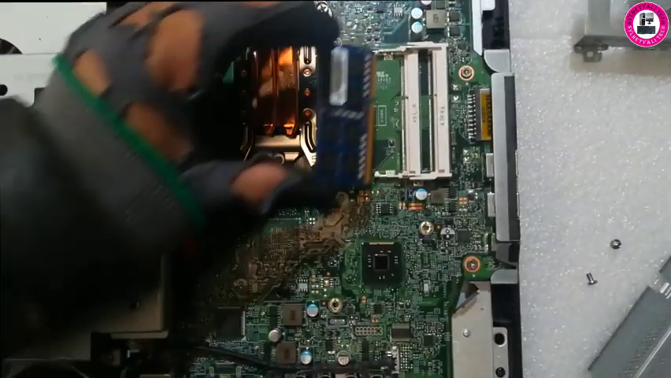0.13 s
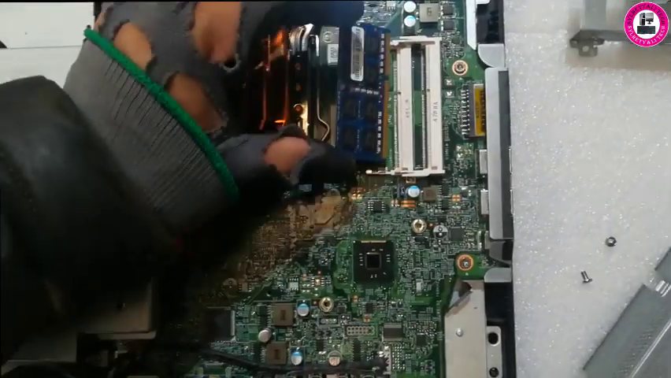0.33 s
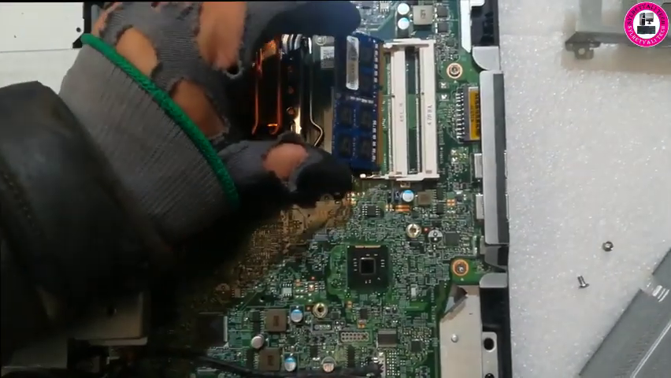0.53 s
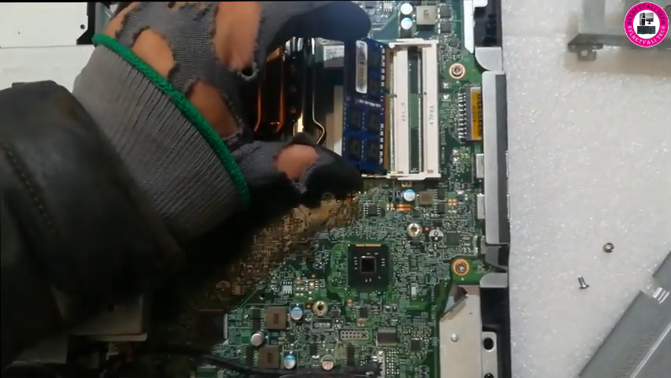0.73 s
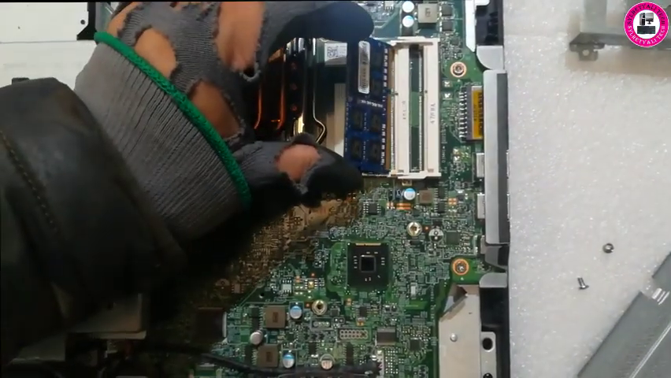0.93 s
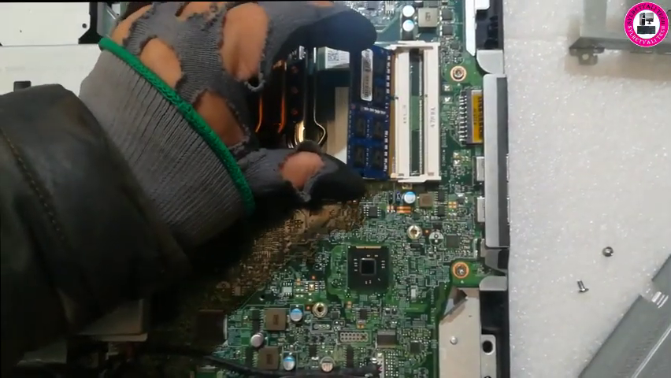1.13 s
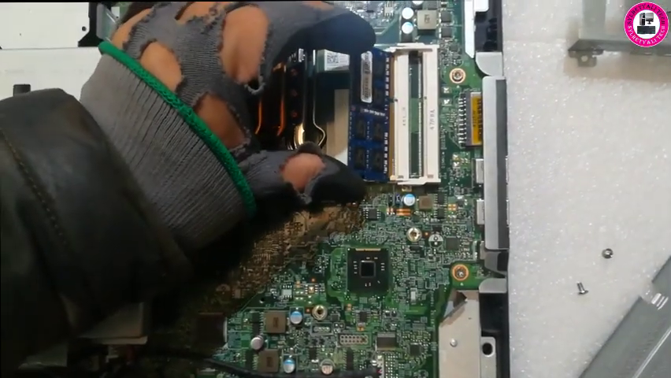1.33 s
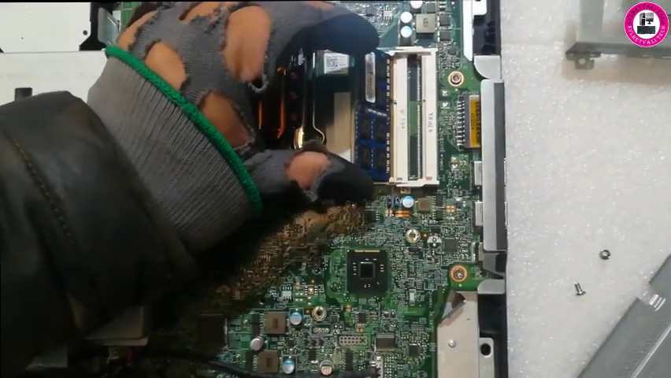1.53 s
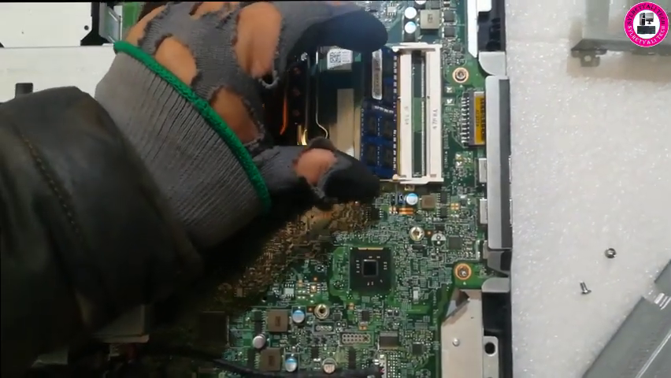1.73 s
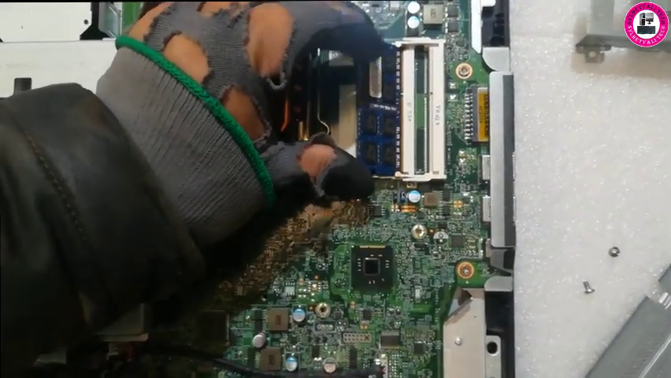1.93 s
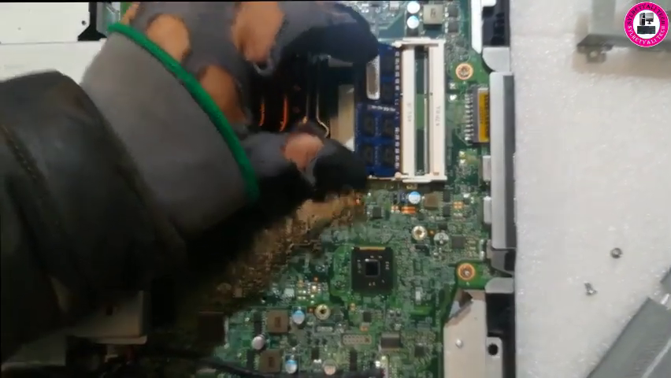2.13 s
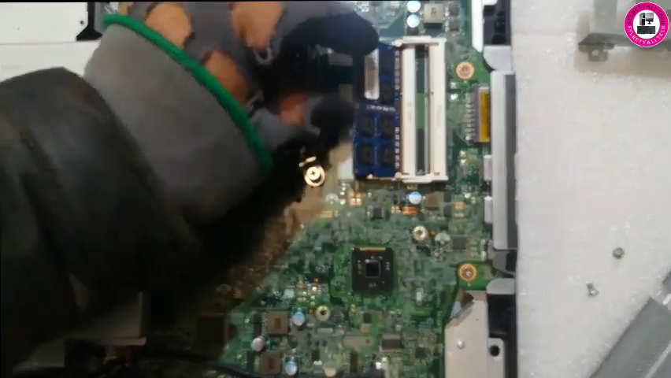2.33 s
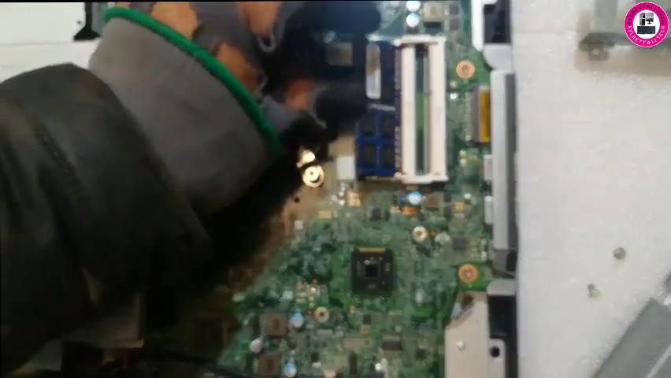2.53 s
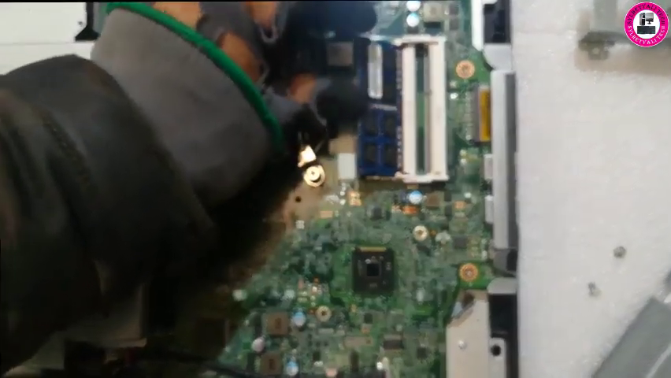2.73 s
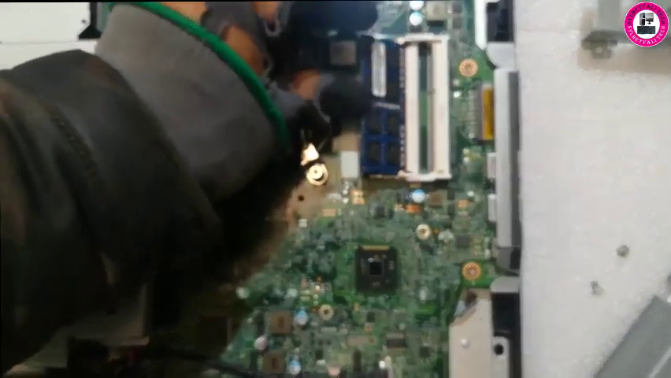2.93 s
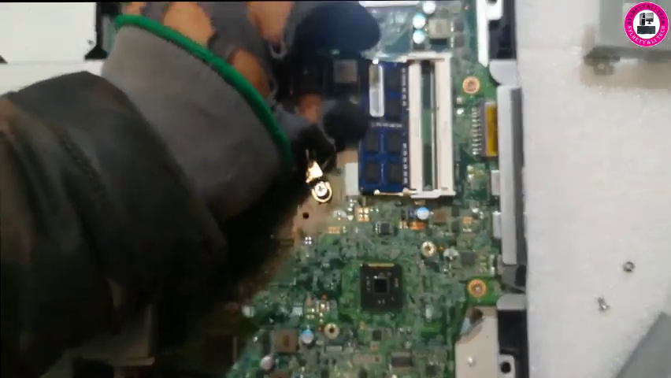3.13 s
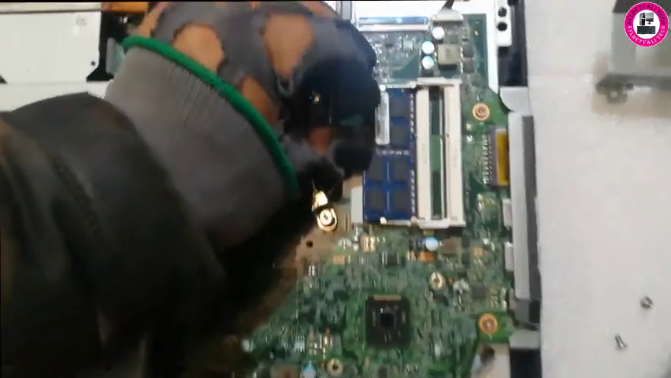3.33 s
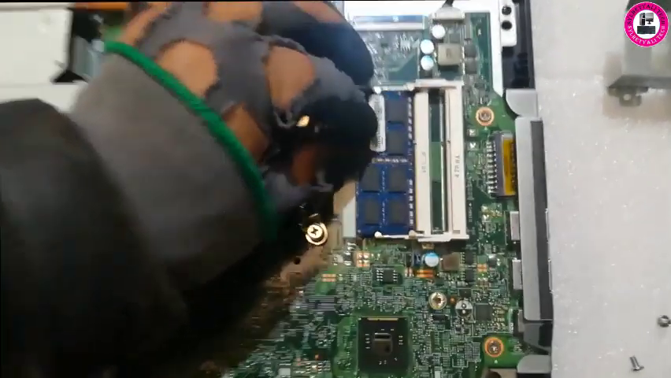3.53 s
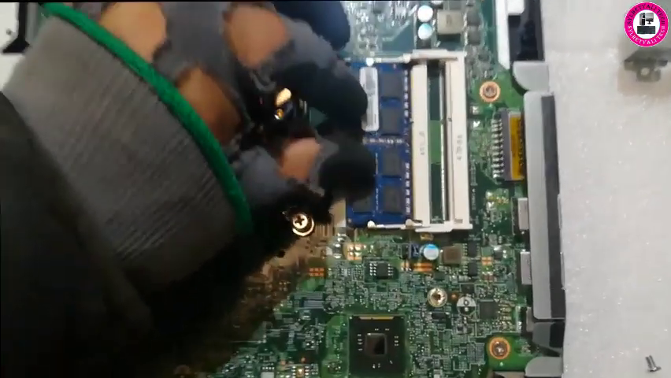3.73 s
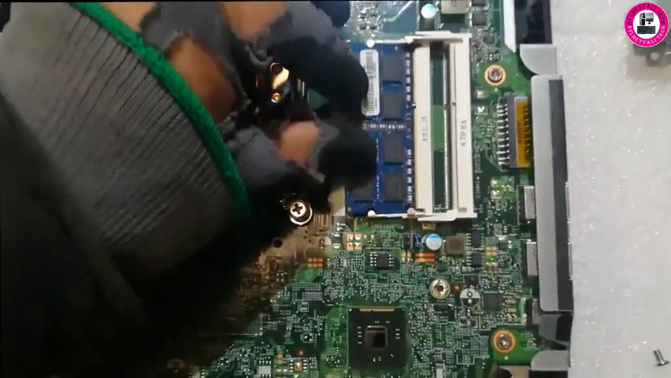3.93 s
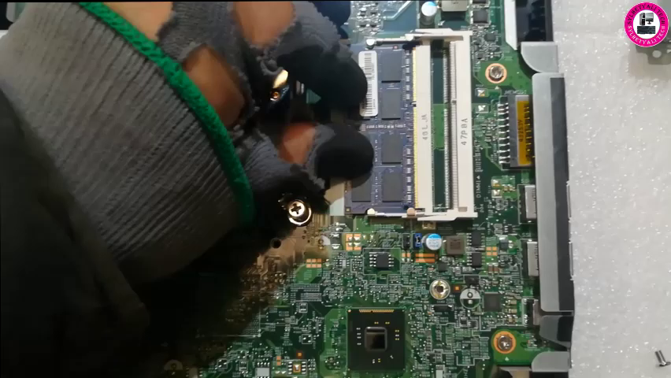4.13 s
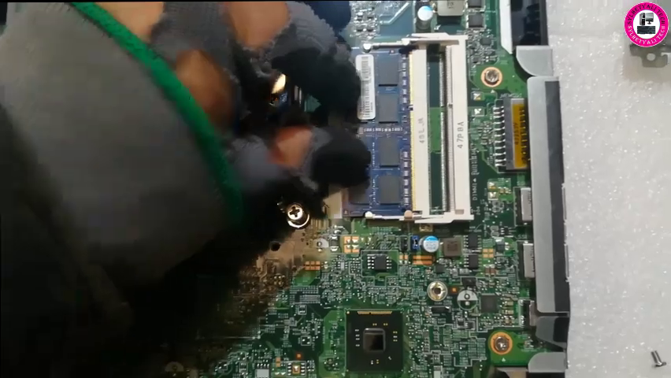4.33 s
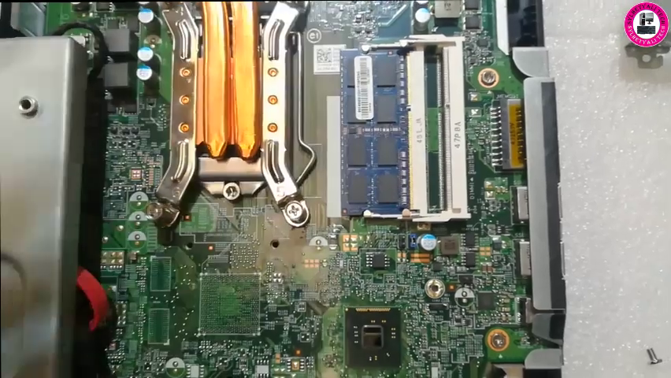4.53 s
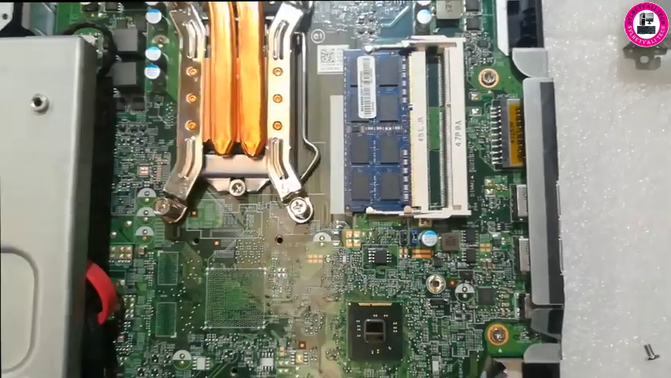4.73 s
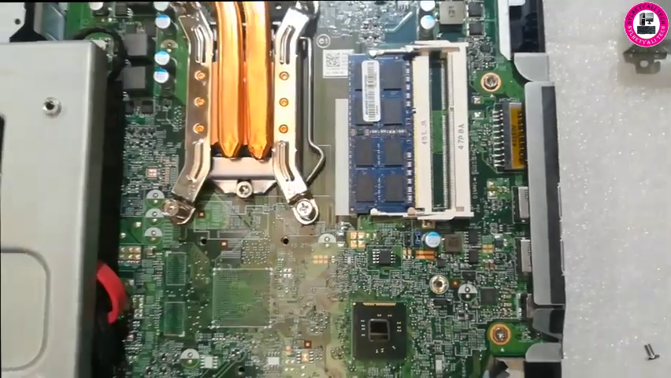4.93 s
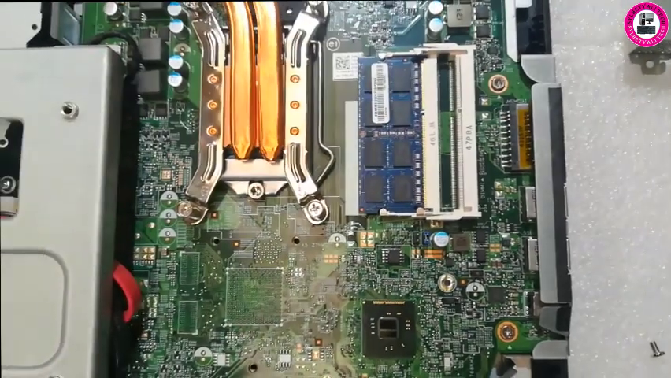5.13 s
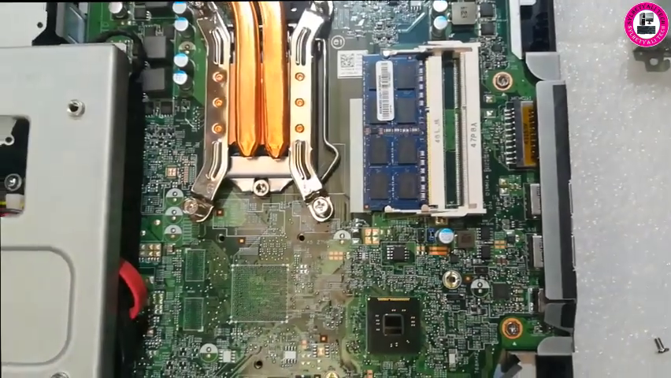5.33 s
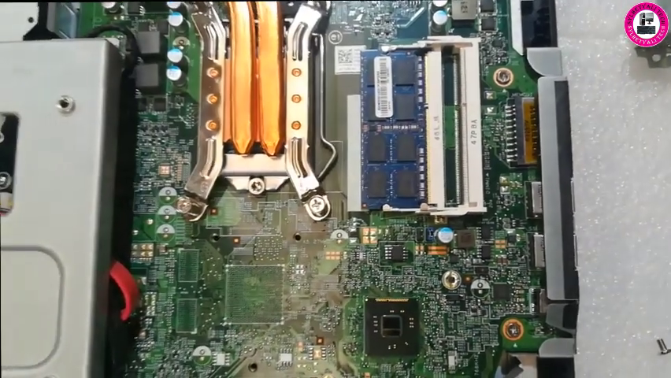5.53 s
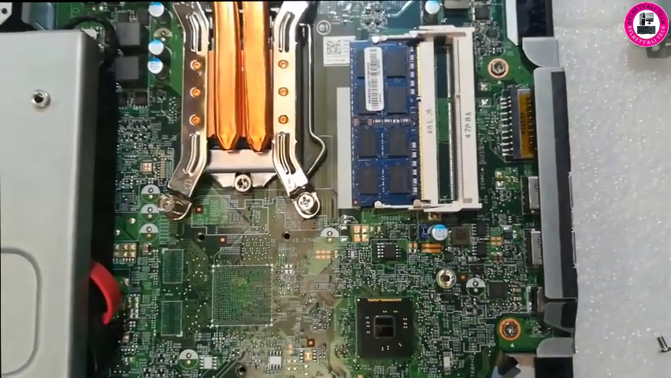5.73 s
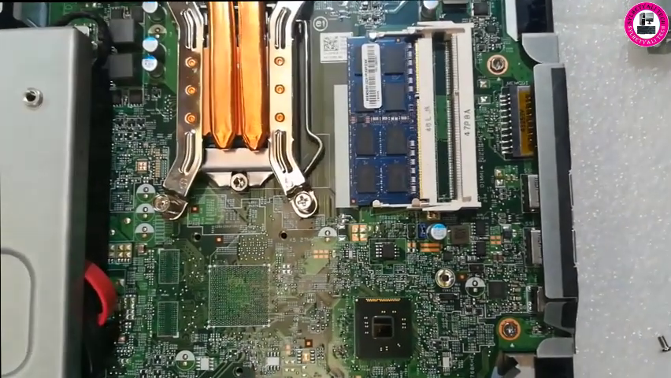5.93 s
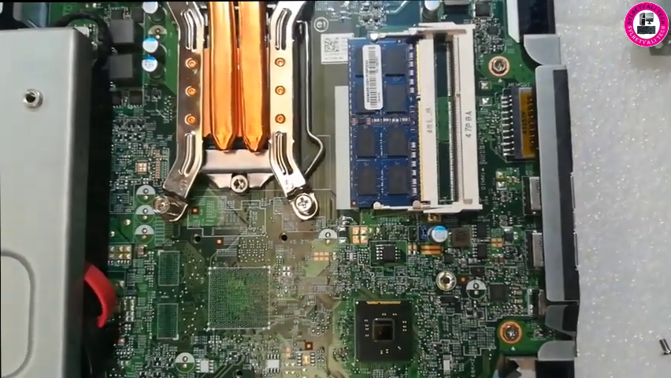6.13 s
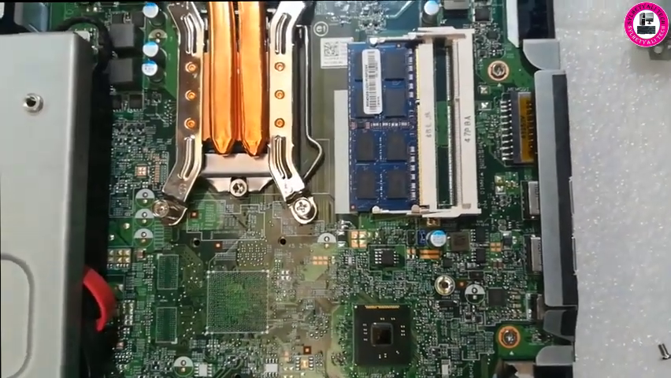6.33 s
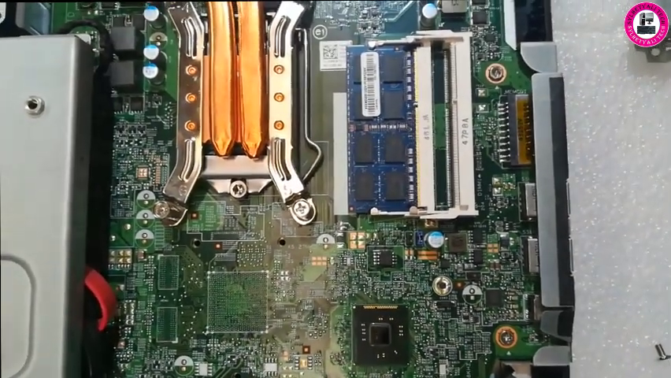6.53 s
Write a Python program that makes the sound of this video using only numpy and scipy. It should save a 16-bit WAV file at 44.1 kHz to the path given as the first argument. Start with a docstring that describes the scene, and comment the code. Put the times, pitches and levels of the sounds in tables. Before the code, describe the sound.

Small hard clicks of a module seating in a slot, ending in one loud double snap, over a low throbbing motor drone and airflow.

```python
"""A gloved hand slides a memory module into a laptop's slot, seats it and presses it until the latches snap.
Each contact is a noise crack plus ringing modes of board and latch springs, close up in a small room.
Cloth swells and scuffs as shaped noise; decaying sines boom in the case; fine high ticks are treble bursts.
Behind it an electric motor drones as a stack of sines, throbbing against the mains hum, in a rush of air."""
import sys
import numpy as np
from scipy import signal
from scipy.fft import rfft, irfft
from scipy.io import wavfile
from scipy.ndimage import uniform_filter1d

SR = 44100
rng = np.random.default_rng(int(sys.argv[2]) if len(sys.argv) > 2 else 0)


def bounce(signal):
    """Save signal as a 16-bit WAV file at the path given by the first command-line argument."""
    frames = np.transpose(np.atleast_2d(signal))
    limited = np.clip(frames, -1, 1)
    pcm = np.round(limited * 32767).astype(np.int16)
    wavfile.write(sys.argv[1], SR, pcm)


N = 291060
TIME = np.arange(N) / SR  # seconds

# Tone of sliding cloth and soft swells. Each row: frequency in Hz, relative level in dB.
CLOTH_COLOUR = [(400, -25), (1000, -6), (2100, -8), (4400, -2.5), (6500, -10.5), (8000, -7), (10000, -20),
                (16000, -17)]
# Tone of the fine high hiss in the air and the swells. Each row: frequency in Hz, relative level in dB.
HISS_COLOUR = [(7000, -20), (9000, -1), (10500, 3.5), (12500, -0.5), (16000, 0)]


def undb(db):
    """Decibels to gain."""
    return 10 ** (np.asarray(db) / 20)


def unit(x):
    """Scale to rms 1."""
    return x / np.sqrt(np.mean(x ** 2))


def on_bins(points, size):
    """Read (Hz, value) points at the bins of a spectrum, along a log frequency axis."""
    hz, value = np.transpose(points)
    bins_hz = np.fft.rfftfreq(size, 1 / SR)
    return np.interp(np.log(bins_hz + 1), np.log(hz + 1), value)


def noise(colour, size=N, alike=0.):
    """Coloured stereo noise of rms 1, with a given likeness (-1 to 1) between the ears."""
    mid, side = rfft(rng.standard_normal((2, size)))
    alike = np.clip(alike, -1, 1)
    ears = mid * np.sqrt(1 + alike) + side * np.sqrt(1 - alike) * np.array([[1], [-1]])
    return unit(irfft(ears * undb(on_bins(colour, size)), size))


def pan(db):
    """Gains of the two ears for a left-minus-right level in dB."""
    return undb(np.array([[db], [-db]]) / 2)


def band(x, hz, kind, order=4):
    """Causal Butterworth filter."""
    return signal.sosfilt(signal.butter(order, hz, kind, fs=SR, output="sos"), x)


def fade(t, t60):
    """Exponential decay by 60 dB in t60 seconds."""
    return np.exp(-np.log(1000) * t / t60)


def add(out, s, sound):
    """Mix a sound in at a time in seconds."""
    start = int(s * SR)
    out[:, start:start + sound.shape[1]] += sound[:, :N - start]


def walk(rate):
    """Slow random drift with a spread near 1, through `rate` random points a second."""
    knots = rng.standard_normal(400)
    return np.interp(TIME * rate, np.arange(len(knots)), knots)


def hush(rise_s, hush_db=-11, rise_at_s=0.53):
    """Gain of a background that starts hushed, then settles at 1."""
    since_rise = np.maximum(TIME - rise_at_s, 0)
    return undb(hush_db * np.exp(-since_rise / rise_s))


def motor(away, waver_db=1.1, housing_waver_db=2, ear_lag_s=0.00041, side_over_db=2, side_away_db=-4):
    """Shaft lines beat four times a second against the mains lines just above them; the housing sings."""
    # Multiples of the shaft rate from twice upwards.
    # Each row: level with the arm over the board in dB, level with the arm away in dB, before the drone gain.
    shaft_lines = [(-47, -48), (-72, -72), (-57, -58.5), (-66, -66), (-56, -57), (-65, -69), (-61, -67),
                   (-68, -83), (-58, -67), (-65, -66), (-65, -68), (-73, -72), (-68, -66), (-70, -64),
                   (-75, -73), (-73, -67)]
    # Magnetic hum: twice the mains, its sideband and its octave.
    # Each row: level with the arm over in dB, level with the arm away in dB, before the drone gain.
    mains_lines = [(-57.3, -58.5), (-62, -66), (-63.5, -66)]
    # The housing sings on high multiples of the shaft rate.
    # Each row: multiple, level with the arm over in dB, level with the arm away in dB, before the drone gain.
    housing_lines = [(33, -64, -62), (34, -69, -72), (35, -62, -61), (36, -63, -65), (37, -65, -72),
                     (38, -64, -63), (39, -63, -63), (40, -63, -61), (42, -66, -66), (48, -75, -69),
                     (58, -74, -71), (80, -70, -71)]
    shaft_hz, mains_hz = 23.99, 50.04
    throb_s = 1.018  # a moment when neighbouring lines line up

    shaft_line_hz = shaft_hz * np.arange(2, len(shaft_lines) + 2)
    low_hz = [*shaft_line_hz, 2 * mains_hz, 2 * mains_hz + 4 * shaft_hz, 4 * mains_hz]
    phases = rng.uniform(0, 2 * np.pi, 100)

    def line(hz, levels_db, wander_db, t):
        """Neighbouring lines share a phase, so they swell together at each throb."""
        db = levels_db[0] * (1 - away) + levels_db[1] * away + wander_db * walk(9.5)
        phase = phases[round(hz / shaft_hz)]
        return np.sqrt(2) * undb(db) * np.sin(2 * np.pi * hz * t + phase)

    low_lines = zip(low_hz, shaft_lines + mains_lines)
    hum = sum(line(hz, db, waver_db, TIME - throb_s) for hz, db in low_lines)
    # the housing's short waves reach the right ear first; their balance shifts as the arm leaves
    ear_time = TIME - np.array([[ear_lag_s], [0]])
    whine = sum(line(k * shaft_hz, db, housing_waver_db, ear_time) for k, *db in housing_lines)
    return hum + whine * (pan(side_over_db) * (1 - away) + pan(side_away_db) * away)


def comb(x, lag_s=0.001149, sway_s=.00008, share=0.2):
    """A nearby reflection combs the rush with slowly drifting bands."""
    late = TIME - lag_s - sway_s * walk(2.8)
    reflection = np.array([np.interp(late, TIME, ear) for ear in x])
    return (x + share * reflection) / np.hypot(1, share)


def background(flicker_db=1.5, drift_db=0.02):
    """Motor drone and moving air; the tone of both changes as the arm leaves."""
    # The arm leaves. Each row: time in seconds, share of the way out.
    arm_path = [(4.25, 0.012), (4.75, 1)]
    # Low air and room noise, arm over the board. Each row: frequency in Hz, relative level in dB.
    rumble_over = [(20, 4), (60, -6), (110, -2), (175, -1), (230, -2), (290, -4.5), (400, -8), (480, -13.5),
                   (650, -11.5), (850, -11), (980, -18), (1100, -9), (1300, -31), (1700, -43)]
    # Low air and room noise, arm away. Each row: frequency in Hz, relative level in dB.
    rumble_away = [(20, 3), (60, -7), (110, -6.5), (165, -2.5), (230, -10.5), (370, -2), (480, -12.5),
                   (560, -10), (650, -13.5), (830, -8.5), (960, -5), (1050, -20), (1150, -6.5), (1600, -49)]
    # Rush of air, arm over the board. Each row: frequency in Hz, relative level in dB.
    rush_over = [(710, -20), (1200, -0.5), (1310, -5), (1410, -1), (1630, -4), (1890, 0.5), (2150, -4.5),
                 (2500, -7.5), (3270, -3), (3910, -6.5), (4990, -2), (6160, -6), (7110, -12.5), (8130, -11),
                 (9000, -19), (11700, -44), (19800, -120)]
    # Rush of air, arm away. Each row: frequency in Hz, relative level in dB.
    rush_away = [(710, -15), (1200, 5.5), (1310, -58), (1340, 5.5), (1420, -1), (1830, -1.5), (2010, 1),
                 (2500, -5.5), (2840, -1), (3910, -4.5), (4950, 1), (6060, -3), (7170, -11), (8340, -9),
                 (9000, -17), (11700, -45), (19800, -120)]

    away = np.interp(TIME, *np.transpose(arm_path))
    near, far = np.sqrt(np.clip([1 - away, away], 0, 1))  # equal-power crossfade

    # likeness between the ears, by frequency in Hz
    alike = on_bins([(60, 0.78), (150, 0.69), (300, -0.99), (650, -0.45), (1400, 0.41)], N)
    rumble = near * undb(-53.5) * noise(rumble_over, alike=alike)
    rumble = rumble + far * undb(-53) * noise(rumble_away, alike=alike)

    rush = near * undb(-54.5) * noise(rush_over) + far * undb(-52.5) * noise(rush_away)
    rush = rush * undb(flicker_db * walk(22) + drift_db * walk(3.86))
    hiss = undb(-65) * noise(HISS_COLOUR)

    # the motor swells by 2 dB just after the snap
    motor_db = 0.13 + 2.0 * np.exp(-((TIME - 3.94) / 0.38) ** 2)
    drone = undb(motor_db) * motor(away) + rumble * pan(-3)
    air = comb(rush) * pan(-4) + hiss * pan(3.4)
    # the air rises a little behind the drone
    return drone * hush(rise_s=0.075) + air * hush(rise_s=0.12)


def contact(pitch_hz, levels_db, ring_db, crack_db=11, crack_t60=0.02, knock_width=1.35, latch_hz=1850,
            tick_hz=7000, scatter_hz=1800, span_s=0.0026):
    """A short crack excites ringing modes, shared between board knock, latch ring and bright tick."""
    # Modes of board, slot and latch springs.
    # Each row: frequency in Hz, relative level in dB, decay by 60 dB in seconds.
    modes = [(743, -5.5, 0.089), (884, 5.5, 0.027), (1017, 0, 0.039), (1378, 0, 0.045), (1572, 0, 0.039),
             (2096, -1.5, 0.036), (2000, -6, 0.057), (2430, 2, 0.019), (3120, -7, 0.025),
             (3320, -3.5, 0.04), (3870, -1, 0.021), (4550, 6.5, 0.015), (5360, 2.5, 0.02),
             (5910, 2.5, 0.014), (6860, -13, 0.028), (8230, 5, 0.0068), (9900, -31, .016),
             (10100, -20, 0.029), (13400, -53, 0.007), (16000, -23, 0.011)]
    # Tone of the crack. Each row: frequency in Hz, relative level in dB.
    crack_colour = [(100, -16), (480, -21), (700, 21), (900, 8), (1500, -4), (1750, 5), (3300, 4.5),
                    (5500, -0.5), (7200, -5), (10000, -7), (16000, -8.5)]

    t = np.arange(4096) / SR
    hz, db, t60 = np.transpose(modes)[:, :, None, None]
    # long waves reach both ears in step, short ones scatter off the hand and the parts
    phases = hz / scatter_hz * rng.standard_normal((len(modes), 2, 1))
    ring = np.sum(undb(db) * fade(t, t60) * np.sin(2 * np.pi * hz * t + phases), axis=0)
    crack = noise(crack_colour, size=len(t), alike=0.1) * fade(t, crack_t60)
    blow = undb(ring_db) * ring + undb(crack_db) * crack

    # the place of the contact picks the board's modes; so small a board radiates little bass
    board = band(blow, 780, "high", order=5)
    knock = band(board, [pitch_hz / knock_width, pitch_hz * knock_width], "band", order=2)
    latch = band(blow, [latch_hz, tick_hz], "band")
    tick = band(blow, tick_hz, "high")
    mix = sum(undb(level_db) * unit(part) for level_db, part in zip(levels_db, (knock, latch, tick)))
    # a level is that of the part's energy gathered into the first few milliseconds
    return mix * np.sqrt(span_s / t[-1])


def module(ring_db=0):
    """The module knocks against slot and latches, and chatters down the springs between the last snaps."""
    # Contacts of module, slot and latches.
    # Each row: start in seconds, knock pitch in Hz, board knock in dB, latch ring in dB, bright tick in dB.
    contacts = [(0.075, 1190, -59, -55, -66), (0.567, 1080, -51.5, -56, -67.5),
                (0.772, 1100, -48.5, -46.5, -70), (0.9265, 1070, -42.5, -49, -62),
                (1.251, 1300, -36.5, -42, -54), (1.381, 990, -41.5, -48, -69),
                (1.410, 990, -42.5, -48, -65), (1.589, 1090, -48, -39, -48), (1.5941, 900, -25, -32, -57),
                (2.431, 1380, -28, -43, -54), (2.4407, 1200, -40, -38, -51), (2.454, 880, -22, -40, -42),
                (2.4575, 1600, -27, -29.5, -57), (2.6525, 1480, -43.5, -33.5, -47),
                (3.8, 1490, -32.5, -44, -44), (3.821, 1230, -23, -32, -50), (3.8236, 1430, -13, -11.5, -14),
                (3.8357, 1200, -15.5, -10, -9.5), (3.838, 1080, -16.5, -7.5, -12)]
    # Uneven radiation to the two sides. Each row: frequency in Hz, left minus right in dB.
    side_balance = [(400, 0), (700, 9), (1000, 4.5), (1400, 3), (2380, 0.5), (4400, -4.5), (8120, -0.5),
                    (15000, 5)]

    out = np.zeros((2, N))
    for s, pitch_hz, *levels_db in contacts:
        add(out, s, contact(pitch_hz, levels_db, ring_db))

    # three slips about 3 ms apart, each weaker than the last
    chatter_db = np.array((-15, -11.5, -24))  # knock, ring and tick at the start of the chatter
    fade_db_per_s, jitter_s = 300, 0.0003
    for late in 0.003 * np.arange(3) + jitter_s * rng.standard_normal(3):
        add(out, 3.826 + late, contact(1150, chatter_db - fade_db_per_s * late, ring_db))

    sides = undb(on_bins(side_balance, N) * np.array([[1], [-1]]) / 2)
    even_power = np.sqrt(np.mean(sides ** 2, axis=0))
    return irfft(rfft(out) * sides / even_power, N)


def room(x, split_hz=4500, low_t60=0.59, treble_t60=0.37, build_s=0.0015):
    """A small room's diffuse tail, shorter in the treble; each channel radiates along its own paths."""
    t, out = TIME[:SR // 2], 0
    for ray in x:
        wash = rng.standard_normal((2, len(t)))
        low = band(wash, split_hz, "low") * fade(t, low_t60)
        treble = undb(-2) * band(wash, split_hz, "high") * fade(t, treble_t60)
        tail = (low + treble) * (1 - np.exp(-t / build_s))
        tail = unit(tail) / np.sqrt(len(t) * len(x))  # keeps the energy of the source
        out = out + signal.oaconvolve(ray[None], tail, axes=1)[:, :N]
    return out * pan(-4.5)


def soft_swells(flicker_db=0.9, cloth_side_db=-3, hiss_side_db=3):
    """Soft rustling noise in bell-shaped swells, cloth tone and fine hiss together, with a flickering level."""
    # Swells of soft noise: the first as the air rises, the rest as the arm moves.
    # Each row: peak in seconds, rise in seconds, fall in seconds, cloth in dB, fine hiss in dB.
    swells = [(0.72, .09, 0.11, -63.5, -76), (2.16, .08, 0.11, -61, -80), (3.13, 0.053, .12, -61, -75),
              (3.42, .05, 0.034, -52.5, -73), (4.37, 0.12, 0.13, -55, -72), (4.9, 0.28, 0.4, -51, -59.5),
              (6.38, 0.21, 0.49, -53, -62.5)]
    out = 0
    for s, rise, fall, cloth_db, fine_db in swells:
        bell = np.exp(-((TIME - s) / np.where(TIME < s, rise, fall)) ** 2)
        cloth = undb(cloth_db) * noise(CLOTH_COLOUR) * pan(cloth_side_db)
        fine = undb(fine_db) * noise(HISS_COLOUR) * pan(hiss_side_db)
        out = out + bell * (cloth + fine)
    return out * undb(flicker_db * walk(25))


def fine_ticks(side_db=3, lowest_hz=11000, t60=0.012):
    """Fine high ticks: a few milliseconds of the highest treble, as decaying noise."""
    # Fine high ticks. Each row: start in seconds, level in dB before the decay.
    ticks = [(1.006, -35), (1.081, -50), (6.459, -40)]
    out, t = np.zeros((2, N)), TIME[:SR // 20]
    for s, db in ticks:
        treble = unit(band(rng.standard_normal((2, len(t))), lowest_hz, "high"))
        add(out, s, undb(db) * treble * fade(t, t60))
    return out * pan(side_db)


def sleeve(grain_db=4, side_db=-3.5):
    """Cloth catches and slips in short scuffs of noise with a grainy, wavering level."""
    # Scuffs of the sleeve. Each row: start in seconds, length in seconds, level in dB.
    scuffs = [(1.58, 0.068, -53.5), (4.667, 0.039, -50), (4.776, 0.097, -50.5), (4.86, 0.009, -36.5),
              (4.875, 0.024, -41.5), (4.96, 0.016, -43), (4.974, .016, -41.5)]
    out = np.zeros((2, N))
    for s, length, db in scuffs:
        size = int(length * SR)
        waver = unit(uniform_filter1d(rng.standard_normal(size), size=40))
        grains = undb(grain_db * waver)
        scuff = noise(CLOTH_COLOUR, size=size) * grains * signal.windows.tukey(size, .5)
        add(out, s, undb(db) * unit(scuff))
    return out * pan(side_db)


def case():
    """Soft pushes of the hand swell and die in the low resonances of the case."""
    # Booms of the case; each peaks after twice its swell time.
    # Each row: start in seconds, pitch in Hz, peak level in dB, swell time in seconds.
    booms = [(1.94, 194.6, -43.5, 0.012), (2.456, 232, -36.5, 0.0074), (3.828, 50, -41, 0.013),
             (3.83, 215, -54, 0.014), (4.02, 193, -37, 0.015), (4.665, 160, -43.5, 0.01),
             (4.865, 198, -44, 0.011)]
    out, t = np.zeros((2, N)), TIME[:SR // 2]
    for s, hz, db, swell in booms:
        rise = t / swell / 2
        envelope = (rise * np.exp(1 - rise)) ** 2
        add(out, s, undb(db) * envelope * np.sin(2 * np.pi * hz * t) * pan(0))
    return out


def scene():
    """Close clicks and cloth, their room tail and the machine behind."""
    scuffs = sleeve()
    # the faint ringing of the small parts stays near them; mostly the cracks fill the room
    radiated = module(ring_db=-4) + scuffs
    close = module() + scuffs + soft_swells() + case() + fine_ticks()
    return close + undb(-22.5) * room(radiated) + background()


def record(dry):
    """Peaks clip at full scale, then a steep low-pass cuts the top above 15.9 kHz."""
    low_pass = signal.ellip(10, .2, 70, 15900, fs=SR, output="sos")
    return signal.sosfilt(low_pass, np.clip(dry, -1, 1))


dry = scene()
out = record(dry)
bounce(out)
```